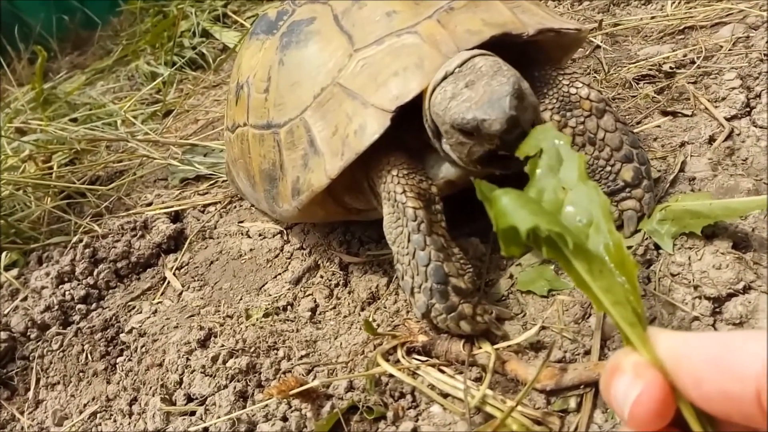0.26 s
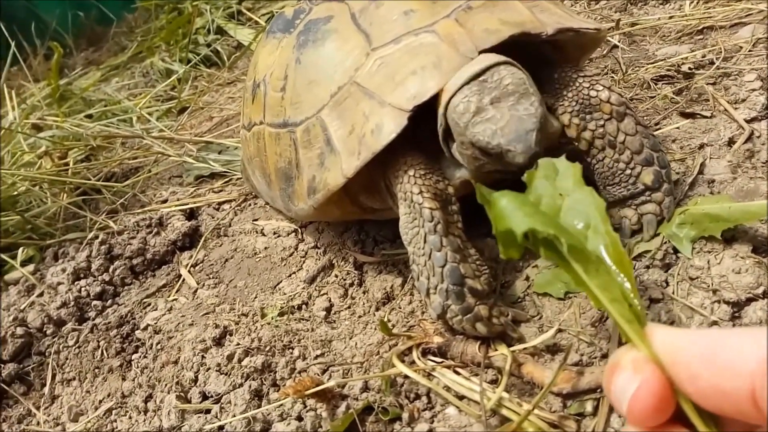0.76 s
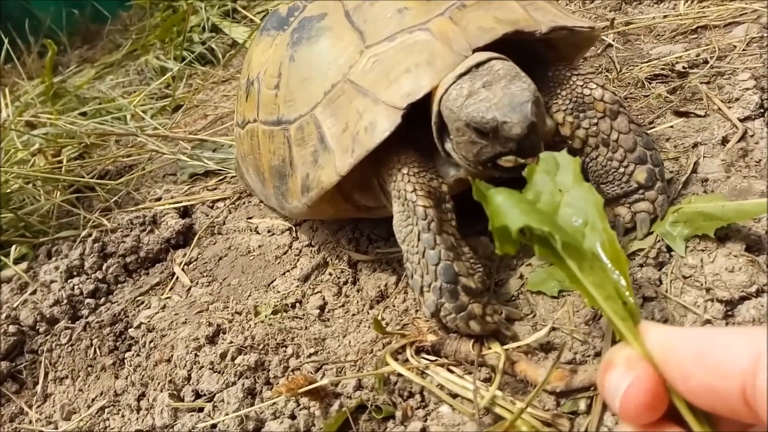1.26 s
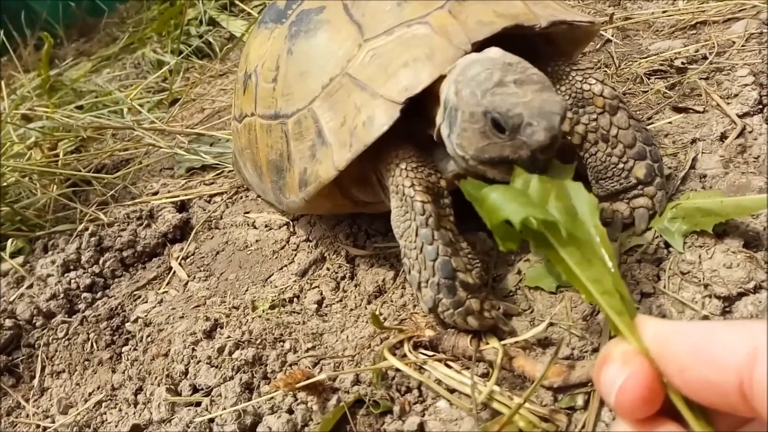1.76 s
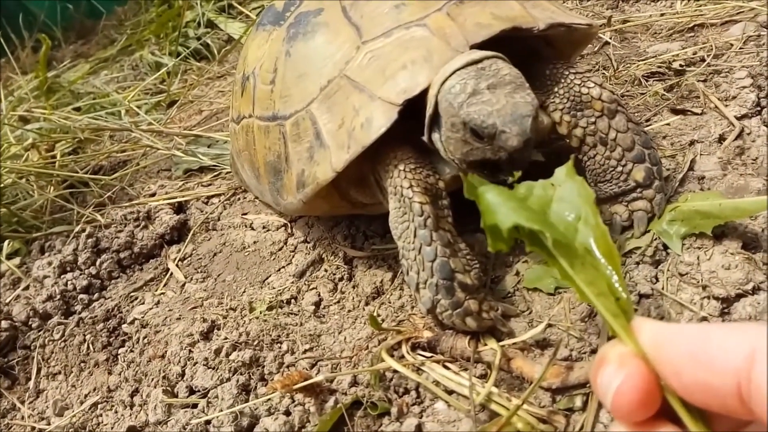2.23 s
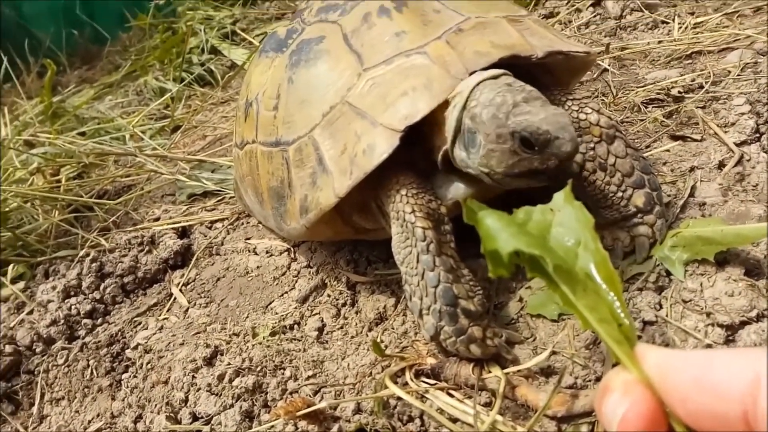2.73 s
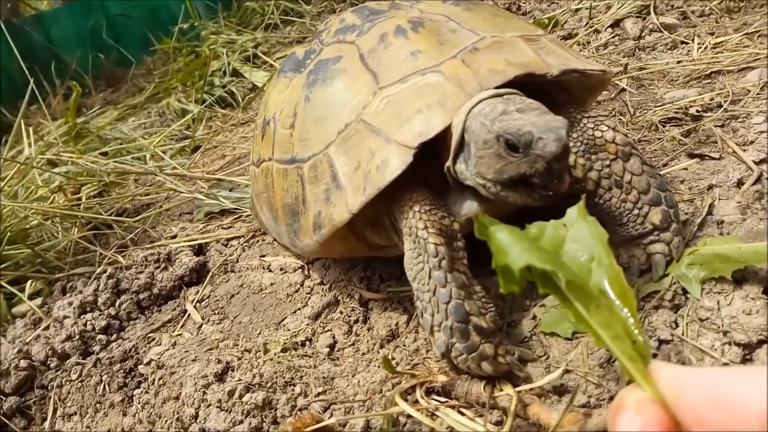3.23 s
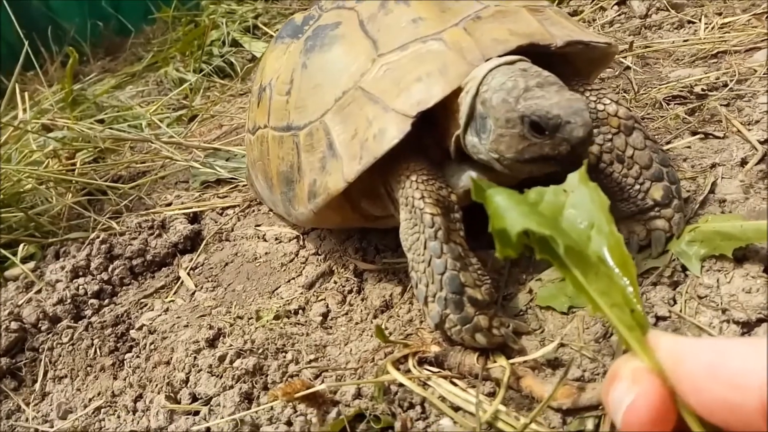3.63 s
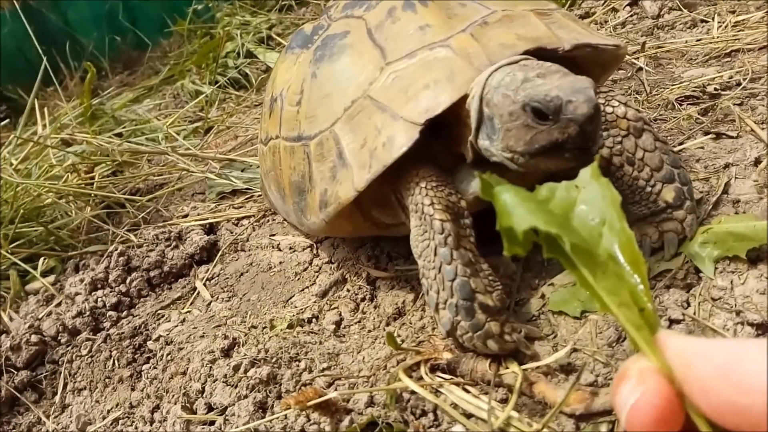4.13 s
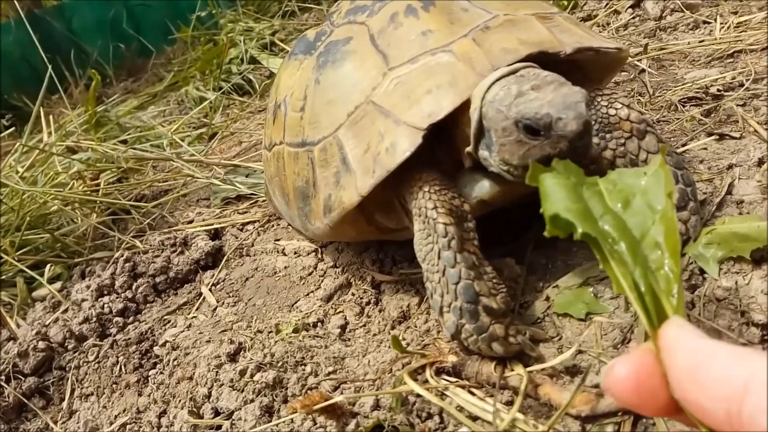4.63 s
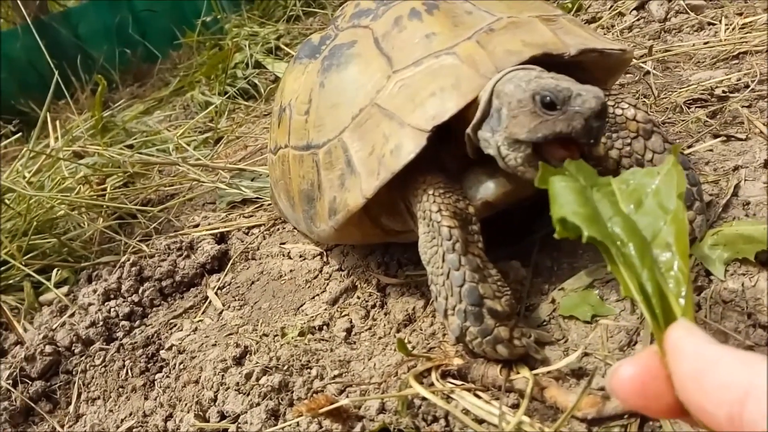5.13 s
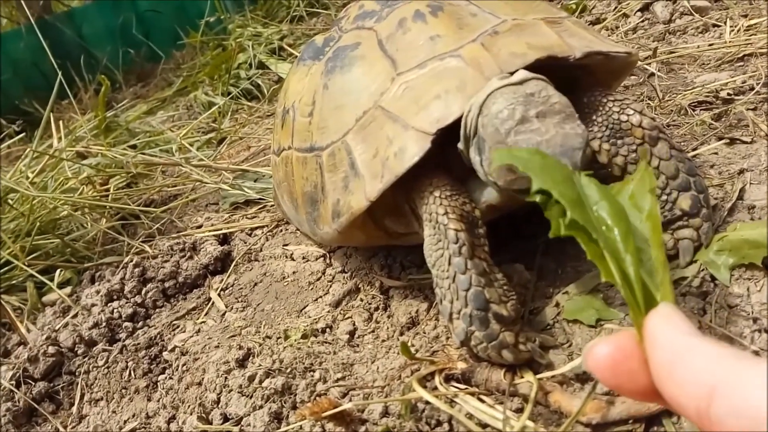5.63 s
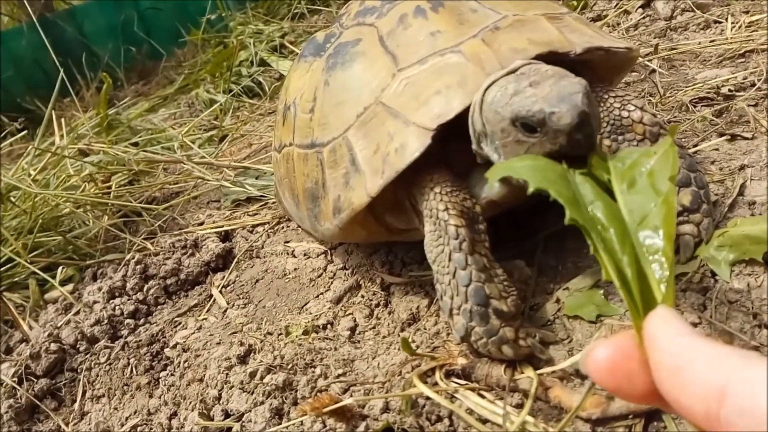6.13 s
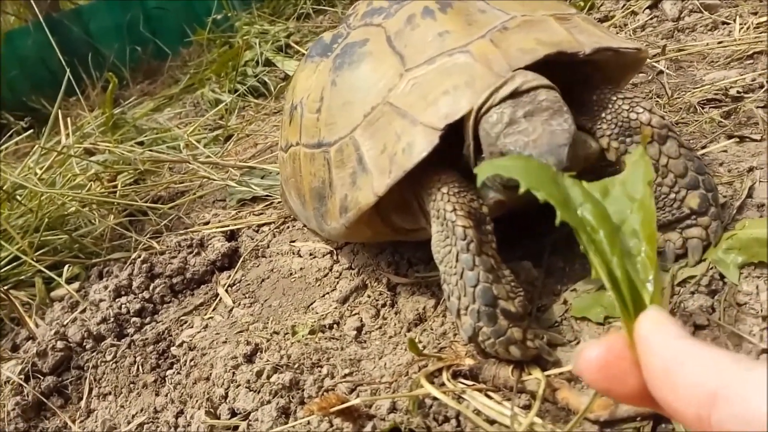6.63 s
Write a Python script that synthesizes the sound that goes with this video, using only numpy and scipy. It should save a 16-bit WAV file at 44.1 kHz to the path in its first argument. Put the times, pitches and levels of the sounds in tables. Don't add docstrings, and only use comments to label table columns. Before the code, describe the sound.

A tortoise bites and tears a juicy leaf in sharp crisp snaps while a crow caws three times over a low outdoor hum.

```python
import sys
import numpy as np
from scipy import signal
from scipy.fft import next_fast_len
from scipy.io import wavfile
from scipy.ndimage import uniform_filter1d

SR = 44100
rng = np.random.default_rng(int(sys.argv[2]) if len(sys.argv) > 2 else 0)


def wav_out(sig):
    wavfile.write(sys.argv[1], SR, np.round(np.clip(np.atleast_2d(sig).T, -1, 1) * 32767).astype(np.int16))


def volts_from_decibels(level):
    exponent = np.asarray(level, float) / 20
    return 10 ** exponent


N = 302967


def evened(x):
    return x / np.sqrt(np.mean(x ** 2) + 1e-20)


def smoothed_noise(count, span, passes=1):
    noise = rng.standard_normal(count)
    for _ in range(passes):
        noise = uniform_filter1d(noise, span)
    return evened(noise)


def read(points, hz):
    f, value = np.transpose(points)
    return np.interp(np.log(hz + 1), np.log(f + 1), value)


def columns(rows, t):
    s, *values = np.transpose(rows)
    return [np.interp(t, s, v) for v in values]


def add(mix, s, sound):
    part = mix[..., round(s * SR):][..., :sound.shape[-1]]
    part += sound[..., :part.shape[-1]]


def resonate(x, hz, width):
    turn = np.exp(2j * np.pi * np.cumsum(hz * np.ones(x.shape[-1])) / SR)
    r = np.exp(-np.pi * width / SR)
    return 2 * (turn * signal.lfilter([1 - r], [1, -r], x / turn)).real


def resonate_twice(x, hz, width):
    return resonate(resonate(x, hz, width), hz, width)


def band(x, low_hz, high_hz, order=2):
    return signal.sosfilt(signal.butter(order, [low_hz, high_hz], "bandpass", fs=SR, output="sos"), x)


def ring(x, hz, width):
    return band(resonate_twice(x, hz, width), 1500, 8020, order=8)


def port_hiss(count, hz, width):
    grain_db = 0.85 * smoothed_noise(count, 150)
    return evened(ring(rng.standard_normal(count) * volts_from_decibels(grain_db), hz, width))


def echoes(x, t60, start_s):
    taps = rng.choice([-1., 1.], (2, SR // 2)) * (rng.random((2, SR // 2)) < .05)
    t = np.arange(SR // 2) / SR
    taps = taps * volts_from_decibels(-60 * t / t60) * (t > start_s)
    return signal.fftconvolve(x, taps / np.linalg.norm(taps[0]), axes=1)[:, :N]


def knock(peak_db, modes, rise_s):
    t = np.arange(4400) / SR
    sound = sum(volts_from_decibels(db - 60 * t / t60) * np.sin(2 * np.pi * hz * t) for hz, db, t60 in modes)
    sound = signal.lfilter(signal.windows.hann(round(rise_s * SR) + 3), 1, sound)
    return volts_from_decibels(peak_db) * sound / abs(sound).max()


# f/Hz, density/dB per Hz
AIR_SPECTRUM = [(15, -27), (60, -9.5), (110, 6.5), (170, -4.5), (260, -9.5), (400, -17.5), (700, -22),
                (1100, -23.5), (1600, -27), (3500, -29.5), (6200, -32), (8200, -43.5), (15000, -44.5)]
# f/Hz, coherence/1
PORT_COHERENCE = [(60, 0.65), (130, 0.55), (290, 0.19), (640, 0.29), (1400, 0.022), (15000, 0)]


def air():
    frames, hz = N // 256 + 5, np.fft.rfftfreq(1024, 1 / SR)
    a, b, c, d, patches = rng.standard_normal((frames, 513, 5)).T
    patches = evened(uniform_filter1d(uniform_filter1d(patches, 12, 0), 14, 1))
    same = np.clip(read(PORT_COHERENCE, hz), -1, 1)[:, None]
    left, other = a + 1j * b, c + 1j * d
    z = np.array([left, same * left + np.sqrt(1 - same ** 2) * other])
    patch_db = 2.2 * patches / (1 + (hz[:, None] / 5000) ** 2)
    z *= volts_from_decibels(read(AIR_SPECTRUM, hz)[:, None] + patch_db)
    return volts_from_decibels(-60) * evened(signal.istft(z, nperseg=1024, noverlap=768)[1][:, :N])


# start t/s, length t/s, level/dB
GRASS_GUSTS = [(0.19, 1.1, -82.5), (0.647, 0.075, -87), (1.69, 0.11, -72.5), (1.792, 0.42, -70.5),
               (2.151, 0.76, -87), (2.555, 0.34, -75.5), (3.112, 0.98, -72.5), (3.197, 0.3, -78),
               (4.814, .08, -71), (4.799, 1.16, -86.5), (6.422, 0.12, -78), (6.56, 0.25, -74.5)]


def breeze():
    calm_db = -80
    level = volts_from_decibels(calm_db + 2.1 * smoothed_noise(N, 2500))
    for s, length, db in GRASS_GUSTS:
        add(level, s, volts_from_decibels(db) * signal.windows.tukey(round(length * SR), .5))
    wander = smoothed_noise(N, 6000, passes=2)
    left = volts_from_decibels(-4.5) * port_hiss(N, 5160, 1400)
    right = volts_from_decibels(1.5) * port_hiss(N, 5850 + 120 * wander, 950)
    return level * np.array([left, right])


# t/s, f/Hz, level/dB
MACHINE_HUM = [(0.0, 93.4, -44), (0.02, 94.6, -54.5), (0.52, 92.27, -51), (0.74, 95.0, -55),
               (1.78, 91.6, -56), (2.16, 93.35, -52), (2.24, 92.1, -62.5), (2.58, 91.8, -50.5),
               (2.66, 94.5, -66.5), (2.95, 91.7, -45.5), (2.98, 90.54, -51.5), (4.92, 89.2, -49),
               (5.57, 87.7, -50.5), (5.66, 86.9, -54), (6.24, 86.96, -50), (6.37, 87.6, -56),
               (6.72, 87.85, -49), (6.87, 89.6, -58.5)]
# f/Hz, bandwidth/Hz, level/dB
WAVERING_TONES = [(119.4, 4.9, -63), (176.8, 34, -68), (235.33, 5.83, -71), (73.4, 37, -67), (36, 18, -75)]
# start t/s, length t/s, f/Hz, level/dB
VEHICLES = [
    (0.03, .7, 72.5, -50),
    (0.0, .72, 25, -58),
    (1.5, .75, 57, -63),
    (4.6, .3, 73, -58),
    (4.52, 2.15, 59, -56),
    (4.2, .3, 59, -62),
    (.85, .2, 60, -61),
]
# start t/s, length t/s, f/Hz, level/dB
FAR_WHINE = (3.5, .62, 957, -71)


def machine():
    flutter_db, flutter_s, sag_per_s = 2.5, 0.048, 0.027
    hz, level_db = columns(MACHINE_HUM, np.arange(N) / SR)
    flutter = smoothed_noise(N, round(flutter_s * SR), passes=2)
    hum = np.sin(2 * np.pi * np.cumsum(hz) / SR)
    out = volts_from_decibels(level_db + flutter_db * flutter) * np.sqrt(2) * hum
    for s, length, f_hz, db in VEHICLES:
        t = np.arange(0, length, 1 / SR)
        turns = f_hz * (t - sag_per_s * t ** 2 / 2)
        swell = signal.windows.tukey(len(t), .4)
        add(out, max(s, 0), volts_from_decibels(db) * np.sqrt(2) * swell * np.sin(2 * np.pi * turns))
    for f_hz, width, db in WAVERING_TONES:
        along = f_hz * hz / hz[0]
        out = out + volts_from_decibels(db) * evened(resonate_twice(rng.standard_normal(N), along, width))
    out = np.array([volts_from_decibels(-0.5) * out, volts_from_decibels(-2.0) * np.roll(out, 14)])
    s, length, f_hz, db = FAR_WHINE
    swell = signal.windows.tukey(round(length * SR), .3)
    whine = evened(resonate(rng.standard_normal((2, SR)), f_hz, 32))
    add(out, s, volts_from_decibels(db) * swell * whine[:, :len(swell)])
    return out


def caw(voice, throat, slack):
    t = np.arange(voice[0][0], voice[-1][0], 1 / SR)
    hz, effort_db = columns(voice, t)
    taut_rough = .36
    rough = .75 * np.minimum(taut_rough + slack * (1 - hz / hz.max()), .9)
    age = t - t[0]
    shut_db, open_db = -3, -.5
    bright_db = shut_db + (open_db - shut_db) * np.minimum(age / .05, 1) + 6.5 * age
    jitter = smoothed_noise(len(t), 250)
    turns = np.cumsum(hz * (1 + .03 * rough * jitter)) / SR
    rattle = 1 + .3 * np.sin(2 * np.pi * np.cumsum(62 * (1 + .15 * jitter)) / SR)
    clear, hoarse = np.zeros((2, len(t)))
    for k, db in enumerate(throat, start=2):
        waver_db = 2.2 * smoothed_noise(len(t), 1500)
        height = volts_from_decibels(db + bright_db * (k - 4))
        clear += height * volts_from_decibels(waver_db) * np.cos(2 * np.pi * k * turns + k * k)
        hoarse += height * evened(resonate(rng.standard_normal(len(t)), k * hz, 240))
    breath = evened(band(rng.standard_normal(len(t)), 1010, 4100, order=3))
    sound = (1 - rough) * evened(clear) + rough * (evened(hoarse) + .4 * breath)
    sound = band(sound * rattle, 640, 2530, order=4)
    level = np.sqrt(uniform_filter1d(sound ** 2, 2600) + 1e-12)
    return volts_from_decibels(effort_db) * sound / level * signal.windows.tukey(len(t), .1)


# t/s, f/Hz (pitch), level/dB (effort)
CAW_CURVES = [
    [(1.78, 311.8, -70), (1.83, 372.3, -59.5), (1.86, 397.7, -55), (1.92, 415, -56.5), (1.98, 394, -55),
     (2.03, 369.3, -58.5), (2.09, 335, -61.5), (2.19, 302.7, -66)],
    [(2.46, 324.5, -75), (2.5, 357, -62), (2.53, 387, -60.5), (2.58, 398, -56.5), (2.68, 380.8, -60),
     (2.75, 363.3, -61.5), (2.83, 344.7, -53.5)],
    [(3.185, 311.6, -63), (3.23, 382, -58.5), (3.27, 418, -55), (3.3, 411.7, -56), (3.36, 372.2, -57),
     (3.47, 363.5, -56), (3.5, 342.7, -59), (3.545, 317.5, -75)],
]
# overtones 2 to 8, level/dB
CAW_THROATS = [
    (-5, -3, -6, -1, -12, -13, -21),
    (-11, -4, 2, -6, -13, -16, -18),
    (-10, -5, -3, 0, -6, -7, -19),
]
CAW_SLACKNESS = (2, 2.4, 1)


def crow():
    lag, turn_rad = 21, 1.75
    voice = np.zeros(N)
    for call, throat, slack in zip(CAW_CURVES, CAW_THROATS, CAW_SLACKNESS):
        add(voice, call[0][0], caw(call, throat, slack))
    analytic = signal.hilbert(voice, next_fast_len(N))[:N]
    turned = (analytic * np.exp(1j * turn_rad)).real
    ports = np.array([voice, volts_from_decibels(3) * np.roll(turned, lag)])
    near = volts_from_decibels(-11) * echoes(ports, t60=.08, start_s=.003)
    far = volts_from_decibels(-10.0) * echoes(ports, t60=1.06, start_s=0.026)
    return ports + near + far


# t/s, peak level/dB
CASE_KNOCK = (2.8243, -14.5)
# f/Hz, level/dB, t60/s
CASE_MODES = [
    (352, 8.5, 0.018),
    (555, -0.5, 0.043),
    (730, 8, 0.016),
    (960, -7, 0.013),
]
# start t/s, length t/s, share before hardest pressure/1, hiss level/dB, drag level/dB
FINGER_STROKES = [
    (2.827, 0.1374, 0.25, -48.5, -56.5),
    (2.96, 0.14, 0.69, -49.5, -61),
    (3.087, 0.099, 0.72, -62, -69),
]


def finger():
    out = np.zeros((2, N))
    s, peak_db = CASE_KNOCK
    add(out, s - .0003, knock(peak_db, CASE_MODES, rise_s=0.00043) * volts_from_decibels(np.array([[0], [-20]])))
    pad = -knock(-25.5, [(226.7, 0, 0.0038)], rise_s=0.00081)
    add(out, s - .0022, pad * volts_from_decibels(np.array([[0], [-6]])))
    count = SR // 2
    lumps_db = 1.9 * smoothed_noise(count, 400)
    scrape = rng.standard_normal(count) * volts_from_decibels(lumps_db)
    drag = evened(sum(resonate_twice(scrape, hz, 380) for hz in (340, 820)))
    hiss = band(port_hiss(count, 5560, 1830), 2150, 7160, order=4)
    light_drag_db, light_hiss_db = -8.5, -10.5
    for s, length, hardest, hiss_db, drag_db in FINGER_STROKES:
        done = np.linspace(0, 1, round(length * SR))
        light = np.interp(done, [0, hardest, 1], [1, 0, 1])
        levels = volts_from_decibels(np.array([drag_db + 7.5 + light_drag_db * light, hiss_db + 3.5 + light_hiss_db * light]))
        at = round((s - FINGER_STROKES[0][0]) * SR)
        rub = np.array([drag, hiss])[:, at:at + len(done)]
        add(out, s, levels * rub * signal.windows.tukey(len(done), .1))
    return out


def ported(parts, pan_db):
    ports = volts_from_decibels(np.array([[.5 * pan_db], [-.5 * pan_db]]))
    ports = ports / np.sqrt(np.mean(ports ** 2))
    tilts = [ports] + [np.sqrt(ports)] * (len(parts) - 1)
    return sum(volts_from_decibels(db) * p * x / np.std(x, 1)[:, None] for (x, db), p in zip(parts, tilts))


def snap(chance, db, hz, low_db, high_db, pan_db, top_hz):
    t = np.arange(chance.shape[1]) / SR
    spray = np.minimum(t / 0.00037, 1) ** 2 * volts_from_decibels(-60 * np.maximum(t - .0006, 0) / 0.011)
    main = 13 * (np.arange(len(t)) == 36)
    shared = np.roll(chance[0] + main, 3)
    cracks = spray * np.array([0.82 * shared + 0.86 * chance[1], chance[0] + main])
    low = band(cracks, 1140, 2820, order=3)
    edge = band(cracks, 8700, top_hz, order=3)
    length = np.sqrt(90 / len(t))
    return volts_from_decibels(db) * length * ported([(ring(cracks, hz, 1470), 0), (low, low_db), (edge, high_db)], pan_db)


def tear(chance, length, db, hz, low_db):
    fade_db, dulling_db = -23.5, 10.5
    size, push, luck = chance[..., :round(length * SR)]
    done = np.linspace(0, 1, size.shape[1])
    cracks = volts_from_decibels(-1.6 * np.log(size + .02)) * (2 * push - 1) * (luck < 3500 / SR)
    low = band(cracks, 760, 3000, order=3)
    sound = ported([(ring(cracks, hz, 1400), 0), (low, low_db + dulling_db * done)], -6)
    return volts_from_decibels(db + fade_db * done) * sound * signal.windows.tukey(len(done), .1)


# t/s, level/dB, ring f/Hz, low part level/dB, left-right level/dB
CRISP_SNAPS = [(0.4352, -44, 6380, -39, -10), (0.877, -32, 5740, -11.5, -12), (0.8842, -40, 5440, -9, -6),
               (0.894, -57, 5300, -7, -10), (1.0705, -60.5, 4970, -31, -15), (1.0971, -63, 5100, -22, -18),
               (1.9806, -31.5, 5660, -19, -10), (1.9843, -25, 6230, -20, -4),
               (1.9876, -37.5, 4040, -29, -19), (5.7112, -56, 5300, -23, 2), (5.7139, -45, 5050, -22, -11),
               (5.7241, -55, 5430, -20, -7), (5.7397, -52, 5960, -14, -10), (5.7454, -39, 5140, -12, 1),
               (5.7557, -34, 5120, -9, -20), (5.7611, -56, 5600, -6, -3), (6.2966, -55, 5124, -15, -19),
               (6.445, -48, 6440, -19, -5), (6.4706, -60, 4990, -18, -16), (6.4813, -58, 5100, -15, -16),
               (6.7078, -26, 6920, -28, 10.5), (6.708, -27, 4630, -8, -9), (6.7081, -37, 2950, -25, 9),
               (6.7324, -73, 5460, 7, -5)]
# t/s, level/dB, f/Hz, low level/dB, left-right level/dB
FINGER_TICKS = [
    (2.8167, -45, 5500, -23, -19),
    (2.8231, -28.5, 5390, -20, -30),
]
# t/s, level/dB, ring f/Hz, low part level/dB, left-right level/dB
JUICY_CRUNCHES = [(4.8904, -54, 6240, -5, 2), (4.8973, -22, 4080, -25, -3), (4.903, -35.5, 4750, -23, -12),
                  (4.9062, -50, 5253, 0, 8), (4.9131, -55.5, 3574, 12.5, -11),
                  (4.9787, -47.5, 4493, -12, -3), (4.985, -49.5, 4457, -9, -12),
                  (5.0669, -42.5, 4040, -21, 5), (5.0755, -37, 3913, -10, -8), (5.079, -38, 4600, -8, -13),
                  (5.0816, -36.5, 4315, -4, -3), (5.0857, -30.5, 4510, -21, -2),
                  (5.0898, -34.5, 4960, -29, -17), (5.1012, -63, 6030, 11, 0), (5.2633, -50, 4300, -35, -7),
                  (5.2746, -58, 4430, -11, -6), (5.2903, -60, 4255, 0, 1)]
# t/s, level/dB, ring f/Hz, low part level/dB, left-right level/dB
BRITTLE_SPLITS = [(0.8497, -41.5, 5150, -24, -23), (0.853, -40.5, 6400, -9, 12),
                  (0.8605, -42, 5140, -28, -3), (0.8633, -53, 5150, -30, -25),
                  (1.1604, -67, 4520, -19, -21), (1.6195, -78.5, 5860, 14, -13),
                  (3.5035, -51.5, 5608, -3, 2), (3.741, -69, 5434, 0, -4), (3.812, -63, 3526, 0, 30),
                  (4.8169, -74.5, 3757, 3.5, 1), (5.662, -70, 4014, 4, -8), (6.456, -73, 3990, 11.5, -2)]
# start t/s, length t/s, crackle level/dB, ring f/Hz, low part level/dB
BLADE_TEARS = [(4.892, 0.056, -53, 4600, -3.5), (4.982, 0.1, -57.5, 4230, -9),
               (5.064, .03, -48.5, 4295, -7.5), (5.08, .025, -38, 5170, -5.5),
               (5.265, 0.028, -51, 4300, -13), (5.285, 0.038, -51.5, 5200, -8),
               (5.706, 0.064, -54.5, 5000, -12.5), (5.75, 0.076, -56.5, 4900, -8.5),
               (6.446, .07, -66.5, 5850, -1), (6.708, .015, -46.5, 5520, -2.5),
               (6.724, 0.058, -69, 4570, 8.5)]
# t/s, peak level/dB, f/Hz, t60/s
JAW_THUDS = [
    (0.875, -49, 703, 0.045),
    (5.078, -45, 902, 0.05),
    (5.101, -52, 1000, .015),
    (4.979, -62, 2700, .05),
    (6.708, -41, 1150, .015),
    (5.272, -54, 887, 0.045),
    (5.275, -58, 434, 0.054),
    (6.454, -52, 264, 0.08),
    (1.986, -49.5, 530, 0.014),
]


def leaf():
    out = np.zeros((2, N))
    kinds = ((CRISP_SNAPS + FINGER_TICKS, -22, 15000), (JUICY_CRUNCHES, -35.5, 10800),
             (BRITTLE_SPLITS, -9, 15000))
    for rows, edge_db, top_hz in kinds:
        for (s, db, hz, low_db, pan_db), chance in zip(rows, rng.standard_normal((len(rows), 2, 660))):
            add(out, s - .0011, snap(chance, db, hz, low_db, edge_db, pan_db, top_hz))
    for (s, *row), chance in zip(BLADE_TEARS, rng.random((len(BLADE_TEARS), 3, 2, 4000))):
        add(out, s, tear(chance, *row))
    for s, db, hz, t60 in JAW_THUDS:
        add(out, s, knock(db, [(hz, 0, t60)], rise_s=0.00022))
    return out


def scene():
    bites = leaf()
    bites = bites + volts_from_decibels(-22.0) * echoes(bites, t60=0.009, start_s=.001)
    return air() + breeze() + machine() + crow() + finger() + bites


def low_pass(x):
    return signal.sosfilt(signal.butter(12, 16500, fs=SR, output="sos"), x)


def record(dry):
    edge = signal.firwin(255, 16100, window=("kaiser", 9), fs=SR)
    mix = signal.oaconvolve(dry, edge[None], "same")
    return low_pass(mix)


dry = scene()
out = record(dry)
wav_out(out)
```